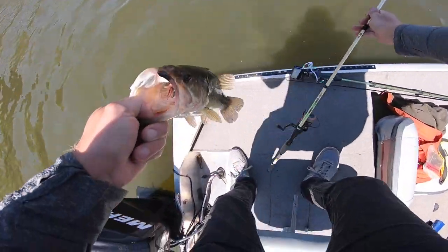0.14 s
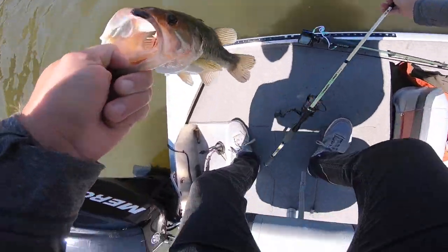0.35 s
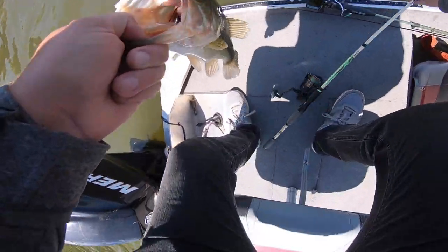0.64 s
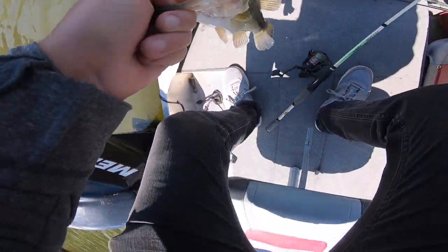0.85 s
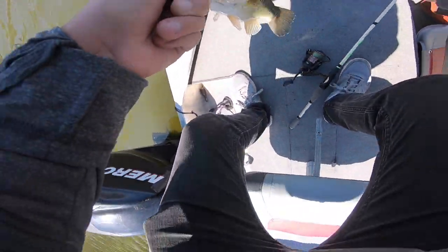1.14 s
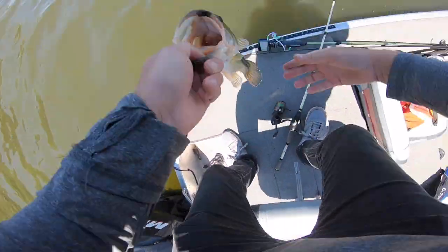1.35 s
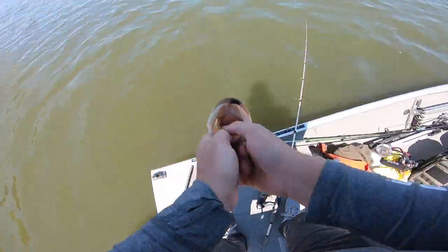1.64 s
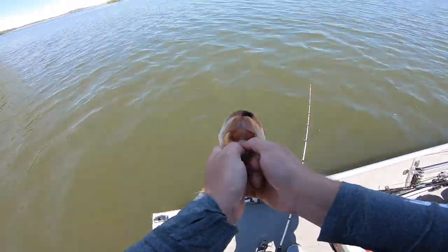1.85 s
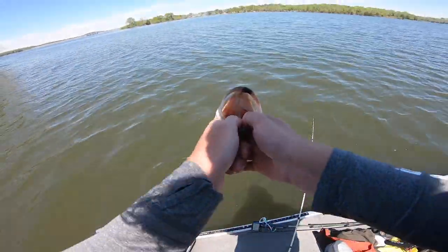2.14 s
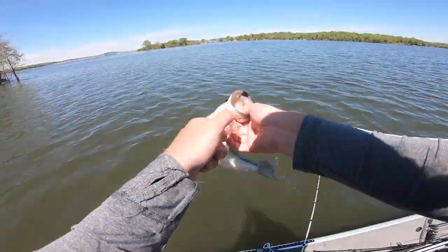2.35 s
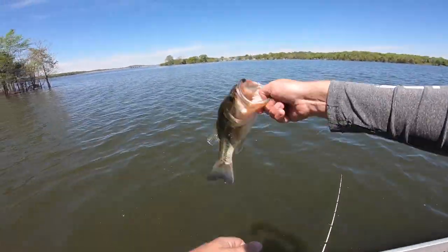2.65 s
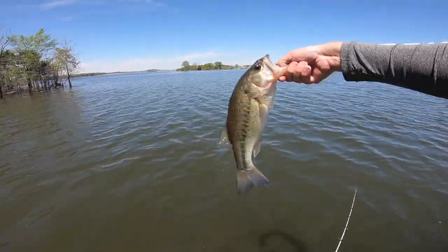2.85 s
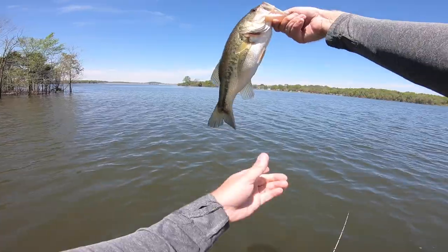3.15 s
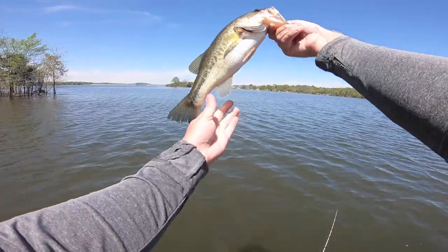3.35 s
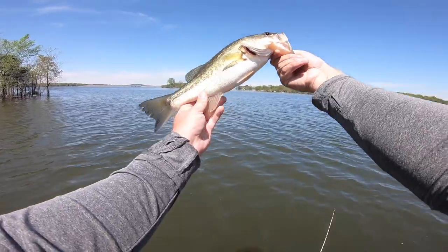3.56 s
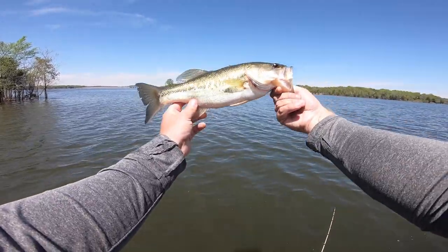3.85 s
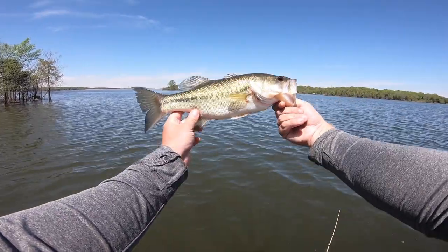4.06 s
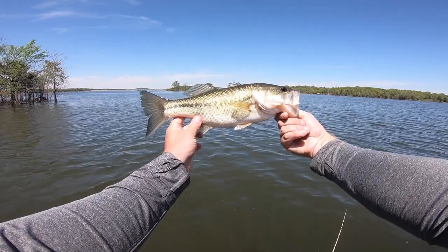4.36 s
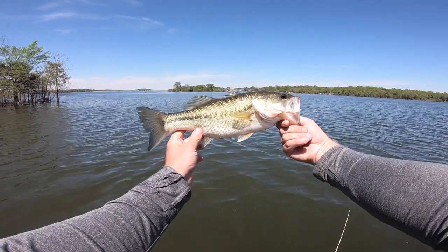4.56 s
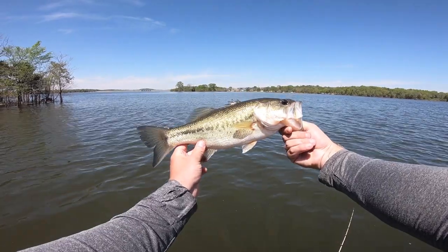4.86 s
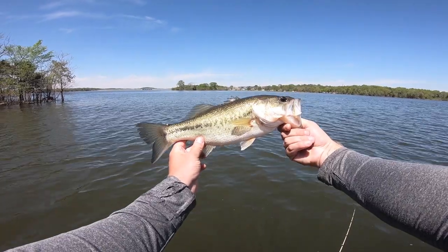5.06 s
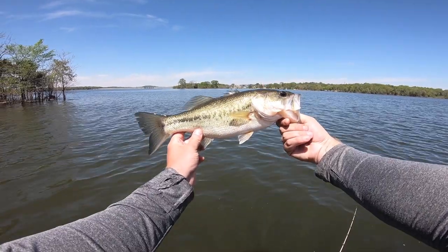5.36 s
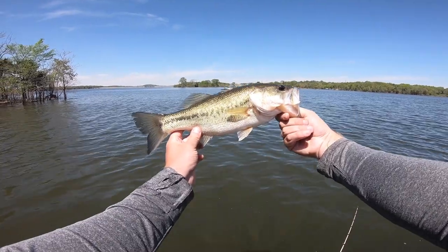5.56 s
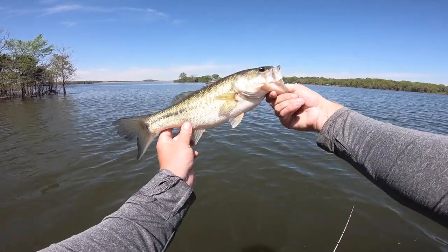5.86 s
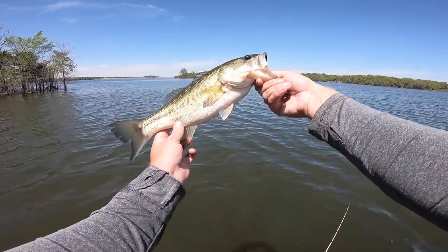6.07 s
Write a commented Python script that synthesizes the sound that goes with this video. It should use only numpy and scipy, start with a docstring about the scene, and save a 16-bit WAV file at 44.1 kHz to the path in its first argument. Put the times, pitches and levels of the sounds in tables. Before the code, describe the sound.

Gusts and low thumps hit the microphone on a small boat, with a rod clattering down, rustling sleeves and gently slapping water.

```python
"""Angler on a small boat

A rod clatters onto the deck, sleeves rustle and wet fingers squeak, close to a chest-worn camera.
Gusts buffet its two microphone ports, with low thumps and wind pops; a wide midrange hiss comes and goes.
Ripples wash, slap and bubble at the hull; tackle ticks, a buckle clicks and a bird whistles far off."""
import sys
import numpy as np
from scipy import signal
from scipy.fft import rfft, irfft, next_fast_len
from scipy.io import wavfile
from scipy.ndimage import uniform_filter1d, map_coordinates

SR = 44100
rng = np.random.default_rng(int(sys.argv[2]) if len(sys.argv) > 2 else 0)


def store_pcm(level_fs):
    """Save levels as 16-bit WAV."""
    pcm = np.round(np.clip(level_fs, -1, 1) * 32767).astype(np.int16)
    wavfile.write(sys.argv[1], SR, np.atleast_2d(pcm).T)


N = 274522
T = np.arange(SR // 3) / SR  # time axis of a one-shot [s]


def amp(db):
    """Decibels to gain."""
    return 10 ** (np.asarray(db) / 20)


def unit(x):
    """Normalise to rms 1."""
    return x / np.sqrt(np.mean(x ** 2) + 1e-20)


def struck(x):
    """Normalise a hit so that its loudest 3 ms have rms 1."""
    return x / np.sqrt(uniform_filter1d(x ** 2, size=132, axis=-1).max() + 1e-20)


def onset(rise):
    """A soft attack that builds over about rise seconds."""
    return 1 - np.exp(-(T / rise) ** 2)


def fade(t60):
    """A decay of 60 dB in t60 seconds."""
    return np.exp(-np.log(1000) * T / np.maximum(t60, 1e-3))


def held(start, end, rise, fall):
    """Full gain from start to end, 20 dB down at rise seconds before and fall seconds after."""
    t = np.arange(N) / SR
    return amp(-20 * (np.maximum(start - t, 0) / rise + np.maximum(t - end, 0) / fall))


def wobble(rate):
    """Smooth random modulation, rate knots a second."""
    return map_coordinates(rng.standard_normal(int(N * rate / SR) + 4), [np.arange(N) * rate / SR])


def filtered(x, response):
    """Apply a frequency response."""
    n = x.shape[-1]
    padded = next_fast_len(n + 8192)
    return irfft(rfft(x, padded) * response(np.fft.rfftfreq(padded, 1 / SR)), padded)[..., :n]


def coloured(x, points):
    """EQ through (frequency [Hz], level [dB]) points, then normalise to rms 1."""
    freqs, db = np.transpose(points)
    return unit(filtered(x, lambda hz: amp(np.interp(np.log(hz + 1), np.log(freqs + 1), db))))


def noise(points, width, size=N):
    """Coloured stereo noise: width 0 is mono, 1 fully decorrelated."""
    mid, side = coloured(rng.standard_normal((2, size)), points)
    return np.array([mid + width * side, mid - width * side]) / np.sqrt(1 + width ** 2)


def patchy(x, depth_db):
    """Make small patches in time and pitch swell and fade."""
    spectra = signal.stft(x, nperseg=512)[2]
    field = uniform_filter1d(rng.standard_normal(spectra.shape[1:]), size=6, axis=0)
    field = uniform_filter1d(field, size=9, axis=1)
    return unit(signal.istft(spectra * amp(depth_db * unit(field)), nperseg=512)[1][:, :N])


def panned(db):
    """Stereo gains of mean power 1, the left db above the right."""
    gains = amp(np.array([db, -db]).reshape(2, -1) / 2)
    return gains / np.sqrt(np.mean(gains ** 2, axis=0))


def ring(modes, scatter_db, damping=1):
    """Damped modes, struck at new strengths every time."""
    hz, db, t60 = np.transpose(modes)[:, :, None]
    sign = rng.choice([-1, 1], hz.shape)
    strength = sign * amp(db + scatter_db * rng.standard_normal(hz.shape))
    return np.sum(strength * fade(t60 / damping) * np.sin(2 * np.pi * hz * T), axis=0)


def whistle(start_hz, end_hz, length, rough):
    """A short gliding tone; roughness blurs it into narrow noise."""
    progress = np.clip(T / max(length, 1e-3), 0, 1)
    lowpass = signal.butter(2, start_hz / 30, fs=SR, output="sos")
    blur = signal.sosfilt(lowpass, rng.standard_normal((2, len(T))))
    phase = 2 * np.pi * np.cumsum(start_hz + (end_hz - start_hz) * progress) / SR
    tone = (1 + rough * unit(blur[0])) * np.sin(phase) + rough * unit(blur[1]) * np.cos(phase)
    return unit(tone) * np.abs(np.sin(np.pi * progress ** 0.58))


def add(track, s, sound):
    """Drop a one-shot into a stereo track at s seconds."""
    part = track[:, max(round(s * SR), 0):][:, :len(T)]
    part += sound[..., :part.shape[1]]


# The bed: dark wash, bright trickle, far drone, microphone hiss: (frequency [Hz], level [dB])
WASH_EQ = [(20, -24), (85, -21.5), (135, -5), (260, -8.5), (400, -3), (700, -8), (1000, -17.5),
           (2000, -38.5), (6000, -68)]
TRICKLE_EQ = [(400, -23), (900, 4.5), (1500, -1), (2100, -2), (2800, -10), (4000, -13.5), (9000, -47.5)]
DRONE_EQ = [(20, -20), (55, -8.5), (90, -28), (135, 3), (220, -3), (330, -13.5), (600, -42), (1100, -85)]
HISS_EQ = [(1000, 0.5), (5000, 6.5), (9000, -1), (12500, -8.5), (15500, -15)]


def lake():
    """Ripples wash and trickle round the boat over a low distant drone and a faint hiss."""
    swell_db = 2.5 * wobble(rate=3.4)
    wash = amp(-61.5 + swell_db) * patchy(noise(WASH_EQ, width=0.021), depth_db=4.5)
    trickle = amp(-83.5 + swell_db) * patchy(noise(TRICKLE_EQ, width=0.05), depth_db=0)
    drone = amp(-53) * noise(DRONE_EQ, width=0.011)
    hiss = amp(-83) * noise(HISS_EQ, width=0.24)
    return wash + trickle + drone + hiss


# The bird's four notes: (offset [s], relative level [dB], start pitch [Hz], end pitch [Hz], length [s])
BIRD_NOTES = [(0.0, -5.5, 2800, 3310, 0.064), (0.055, 0.5, 4310, 4850, 0.039), (0.11, -5, 3830, 3400, 0.04),
              (0.17, -8, 2726, 2510, 0.17)]
# Cues for the phrase: (time [s], relative level [dB])
BIRD_CUES = [(2.851, -66), (3.238, -59), (3.63, -61), (5.235, -74.5)]


def bird():
    """A bird repeats its phrase on the shore; the trees scatter it into a short tail."""
    out = np.zeros((2, N))
    for s, db in BIRD_CUES:
        for offset, note_db, start_hz, end_hz, length in BIRD_NOTES:
            add(out, s + offset, amp(db + note_db - 9) * whistle(start_hz, end_hz, length, rough=0.5))
    trees = rng.standard_normal((1, len(T))) * fade(t60=0.22)
    tail = signal.fftconvolve(out, trees / np.linalg.norm(trees), axes=1)[:, :N]
    return out + amp(-8.5) * tail


# Little gurgles at the hull: (time [s], relative level [dB], centre pitch [Hz], spread in time [s])
GURGLES = [(2.966, -56.5, 1300, 0.068), (4.583, -63.5, 1577, 0.025), (4.767, -52, 1163, 0.048),
           (4.851, -62, 1460, 0.031), (4.953, -56.5, 1484, 0.034), (5.181, -67, 1500, 0.033),
           (5.909, -67, 1820, 0.02)]


def bubbles():
    """Each gurgle is a cluster of bubbles of different sizes, each rising in pitch as it dies."""
    count, t60, attack_s = 22, 0.022, 0.001
    out = np.zeros((2, N))
    for s, db, hz, spread in GURGLES:
        birth = rng.random((count, 1)) * spread
        pitch = hz * np.exp(0.16 * rng.uniform(-1.26, 1, (count, 1)))
        strength_db = 3 * rng.standard_normal((count, 1))
        age = np.maximum(T - birth, 0)
        envelope = amp(strength_db - 60 * age / t60) * (1 - np.exp(-age / attack_s))
        chirps = np.sin(2 * np.pi * pitch * age * (1 + 0.8 * age))
        add(out, s, amp(db - 0.5) * struck(np.sum(envelope * chirps, axis=0)))
    return out


# Ripples hitting the hull: (time [s], level [dB], attack [s], t60 [s])
HULL_SLAPS = [(.15, -37.5, 0.048, 0.2), (4.775, -35.5, 0.016, 0.35), (5.538, -41, 0.0088, 0.32),
              (5.58, -32.5, 0.012, 0.16), (5.612, -37, 0.0083, 0.17)]
# The low body of a slap: (frequency [Hz], level [dB])
SLAP_EQ = [(71, -29), (120, -0.5), (173, 2.5), (255, -4), (334, 4), (403, -8), (500, -3), (720, -21.5),
           (1570, -48), (3000, -60), (3900, -78.5), (6600, -120)]


def hull_slaps():
    """A ripple swells against the hull and dies away with a little fine spray."""
    out = np.zeros((2, N))
    for s, db, rise, t60 in HULL_SLAPS:
        swell = onset(rise) * fade(t60)
        body = noise(SLAP_EQ, width=0.004, size=len(T))
        spray = amp(-34) * noise(TRICKLE_EQ, width=0.01, size=len(T))
        add(out, s, amp(db) * swell / swell.max() * (body + spray))
    return out


# Swells of the wide hiss: (start [s], end [s], level [dB])
WIDE_SWELLS = [(0.426, 0.57, -59), (0.59, 1.25, -55), (1.319, 1.72, -47), (1.75, 1.9, -51),
               (1.937, 2.2, -51), (2.284, 2.662, -59), (5.71, 6.126, -63.5)]
# Its midrange colour: (frequency [Hz], level [dB])
WIDE_EQ = [(320, -32.5), (550, 2), (699, -6), (957, -1.5), (1320, -10.5), (1710, -19.5), (3420, -34),
           (4080, -44), (5000, -39), (6500, -70.5), (11000, -120)]


def wide_hiss():
    """A wide midrange hiss swells and fades, opposite in phase left and right."""
    envelopes = [amp(db) * held(start, end, rise=0.1, fall=0.24) for start, end, db in WIDE_SWELLS]
    hiss = unit(coloured(rng.standard_normal(N), WIDE_EQ) * amp(1.6 * wobble(rate=22)))
    return np.array([[1], [-1]]) * np.max(envelopes, axis=0) * hiss


# Gusts on the ports: (start [s], end [s], flutter level [dB], rumble over flutter [dB],
# left over right [dB], stereo width [0-1])
PORT_GUSTS = [(0.009, 0.307, -41, -6.5, 1, 0), (0.434, 0.535, -33, -2.5, -4, 0.86),
              (0.564, 0.671, -30.5, 0, -3.5, 0.86), (0.74, 1.033, -35, -8.5, -12, 0.85),
              (1.082, 1.23, -39, -13, -7, 0.98), (1.344, 1.601, -30.5, -7.5, -13, 0.7),
              (1.739, 1.822, -38.5, 0.5, -15, 0.92), (1.828, 2.056, -32.5, 6.5, -2.5, 1),
              (2.035, 2.256, -29.5, 4.5, -3, 1), (2.297, 2.385, -43.5, 10, -10, 0.93),
              (2.46, 2.738, -49, -12, -13.5, 0.93), (3.023, 3.081, -49.5, 5, 1.5, 0),
              (4.407, 4.955, -57.5, -3.5, 2, 0), (5.039, 5.144, -39.5, 6.5, -4.5, 1),
              (5.15, 5.334, -41, 11.5, -2.5, 1), (5.444, 5.5, -40, 9, -7.5, 1),
              (5.56, 5.662, -35, 6.5, -4, 1), (5.68, 5.8, -33.5, 11, -1, 1),
              (5.898, 6.049, -42, 9.5, -7, 0.9), (6.205, 6.3, -29.5, -12, -15, 0.93)]
# The two layers of a gust: (frequency [Hz], level [dB])
RUMBLE_EQ = [(10, -23), (25, -7.5), (60, -1), (100, -6.5), (160, -13.5), (400, -57), (1000, -100)]
FLUTTER_EQ = [(40, -33), (90, -4), (140, 3), (220, -4.5), (320, -13.5), (480, -23.5), (900, -42),
              (3000, -91)]


def buffeting():
    """Gusts push on each port in lumps: a deep rumble and a faster flutter."""
    flutter_power, rumble_power, wide_power = np.zeros((2, N)), np.zeros((2, N)), np.zeros(N)
    for start, end, db, rumble_db, pan_db, gust_width in PORT_GUSTS:
        power = (amp(db) * panned(pan_db) * held(start, end, rise=0.095, fall=0.072)) ** 2
        flutter_power += power
        rumble_power += power * amp(rumble_db) ** 2
        wide_power += gust_width * power.mean(axis=0)
    calm_power = amp(-71) ** 2  # the air is never quite still
    width = wide_power / (flutter_power.mean(axis=0) + calm_power)
    lumps = amp(3.5 * wobble(rate=28))
    rumble = np.sqrt(rumble_power + calm_power) * unit(noise(RUMBLE_EQ, width) * lumps)
    flutter = unit(noise(FLUTTER_EQ, width) * lumps * amp(1.3 * wobble(rate=70)))
    return rumble + np.sqrt(flutter_power) * flutter


def hollow_band(hz):
    """A narrow, hollow band of hiss in each sleeve swish, coloured by the microphone."""
    step = 1.17  # frequency ratio from the centre of the band to its shoulders
    band = [(hz / step ** 4, -50), (hz / step, -13), (hz, 0),
            (hz * step, -13), (hz * step ** 4, -50), (hz * step ** 12, -90)]
    return noise(band, width=0.087)


# Arm moves: (start [s], end [s], swish level [dB], closeness to the ports [dB], band centre [Hz],
# band over swish [dB])
ARM_MOVES = [(0.0, 0.203, -70, -6, 4600, 1), (0.323, 0.675, -69, -2, 6160, -7.5),
             (0.707, 1.276, -77.5, 0, 7300, -16), (1.271, 1.84, -66.5, -0.5, 4400, -5.5),
             (2.035, 2.156, -70, -1, 4400, -7), (2.318, 2.661, -75.5, -3.5, 6110, -7.5),
             (2.779, 3.0, -73, -18, 4640, 0.5), (3.1, 3.22, -71.5, -23, 5000, -5.5),
             (3.297, 3.509, -77.5, -25, 4900, -4.5), (3.676, 3.888, -74.5, -31, 4810, 1),
             (4.316, 4.993, -82.5, -12, 4500, -3.5), (5.184, 5.4, -86.5, -9, 4670, 3),
             (5.429, 5.52, -92.5, 1.5, 4750, 10.5), (5.56, 5.75, -82.5, 3.5, 4500, 3.5),
             (6.22, 6.297, -64.5, -7, 4900, 0)]
# Cloth layers: airy swish, rustling folds, crisp scratch, dull rub: (frequency [Hz], level [dB])
SWISH_EQ = [(1200, -31), (2600, -8), (3250, -8), (3800, 2.5), (4600, 3.5), (5400, 0), (6300, -0.5),
            (7300, -13.5), (10000, -20.5), (15000, -47.5)]
RUSTLE_EQ = [(400, -12.5), (900, 0.5), (1200, 2), (1450, 5.5), (1750, 0), (2200, -3), (2900, -10.5),
             (4000, -26), (9000, -41)]
SCRATCH_EQ = [(2000, -18.5), (3200, -13), (5000, -5), (7800, 1.5), (10800, -12.5), (12700, -9),
              (15500, -20)]
RUB_EQ = [(60, -25.5), (150, -5), (400, 0), (700, -9.5), (1000, -12.5), (2000, -37.5), (6000, -69.5)]


def sleeves():
    """Sleeves swish and rustle; near the ports threads crackle and cloth rubs the housing."""
    motion, contact, bands = np.zeros(N), np.zeros(N), np.zeros((2, N))
    for start, end, db, close_db, band_hz, band_db in ARM_MOVES:
        swing = amp(db) * held(start, end, rise=0.039, fall=0.28)
        motion = np.maximum(motion, swing)
        contact = np.maximum(contact, swing * amp(close_db))
        bands += amp(band_db) * swing * hollow_band(band_hz)
    swish = patchy(noise(SWISH_EQ, width=0.08), depth_db=2.6)
    rustle = amp(6.5) * patchy(noise(RUSTLE_EQ, width=0.04), depth_db=4)
    catches = rng.random(N) < 260 / SR  # about 260 threads catch each second
    crackle = catches * rng.standard_normal(N) * amp(3.9 * rng.standard_normal(N))
    scratch = noise(SCRATCH_EQ, width=1) + 0.5 * coloured(crackle, SCRATCH_EQ)
    scratch = unit(scratch * amp(1.1 * wobble(rate=64)))
    rub = amp(14.5) * noise(RUB_EQ, width=0.11)
    return motion * (swish + rustle) + bands * amp(1.7 * wobble(rate=45)) + contact * (scratch + rub)


# A cuff brushing close to the ports: (time [s], level [dB], length [s])
CUFF_STROKES = [(0.044, -79, 0.4), (0.292, -83, 0.23), (0.496, -69, 0.22), (0.946, -69, 0.23),
                (1.632, -57, 0.15), (2.016, -63.5, 0.21), (2.287, -63.5, 0.034), (2.393, -67.5, 0.033),
                (2.614, -72, 0.02), (3.086, -81, 0.13), (5.471, -67.5, 0.38), (6.173, -66, 0.23)]
# Its bright scratch: (frequency [Hz], level [dB])
CUFF_EQ = [(2000, -1.5), (5000, 0), (8300, 2), (10500, -6), (12500, -6.5), (14200, -8.5), (15600, -25)]


def cuff_strokes():
    """Each drag of the cuff is a short, grainy scratch."""
    out = np.zeros((2, N))
    for s, db, length in CUFF_STROKES:
        progress = np.clip(T / length, 0, 1)
        swell = np.abs(np.sin(np.pi * progress ** 0.69)) ** 1.3
        grain = unit(noise(CUFF_EQ, width=0.9, size=len(T)) * amp(3.2 * wobble(rate=250)[:len(T)]))
        add(out, s, amp(db) * swell * grain)
    return out


# Wet squeaks: (time [s], relative level [dB], pitch [Hz], length [s])
FINGER_SQUEAKS = [(0.12, -49.5, 4550, 0.034), (0.124, -62.5, 6080, 0.18), (0.179, -47.5, 4410, 0.012),
                  (2.284, -51, 5950, 0.016), (2.336, -60, 5660, 0.021), (2.396, -51, 5920, 0.014),
                  (3.094, -49, 1392, 0.062), (3.143, -55, 5050, 0.019)]


def finger_squeaks():
    """Wet fingers squeak on rod and fish in short, rough tones."""
    out = np.zeros((2, N))
    for s, db, hz, length in FINGER_SQUEAKS:
        add(out, s, amp(db - 8.5) * whistle(hz, hz, length, rough=2.2))
    return out


# Ticks and scuffs of tackle and cuffs: (time [s], level [dB], pitch [Hz], t60 [s])
TACKLE_TICKS = [(0.208, -64.5, 10000, 0.05), (0.312, -58.5, 4570, 0.018), (0.328, -66, 6500, 0.015),
                (0.346, -43, 1220, 0.057), (0.349, -57.5, 11600, 0.02), (0.3612, -45.5, 8930, 0.0094),
                (0.362, -40.5, 1670, 0.014), (0.5494, -45, 4750, 0.015), (0.577, -52.5, 6800, 0.017),
                (0.5839, -56.5, 11080, 0.015), (1.072, -58, 3830, 0.089), (1.132, -61, 4430, .02),
                (1.272, -46, 4000, .04), (1.325, -42.5, 10980, 0.031), (1.623, -50, 5830, 0.037),
                (1.638, -49, 6800, 0.093), (1.652, -44.5, 1440, 0.15), (1.667, -51, 2580, 0.02),
                (1.682, -46, 6160, 0.015), (1.901, -55.5, 2600, 0.036), (2.0293, -56, 6400, 0.01),
                (2.0795, -56, 3750, 0.026), (2.631, -59.5, 4830, 0.053), (2.717, -53, 1260, 0.15),
                (3.148, -55, 596, 0.03), (4.298, -56.5, 1570, 0.16), (4.307, -69, 4120, 0.043),
                (4.358, -73, 5550, 0.01), (5.309, -75, 5700, 0.023), (6.081, -65, 850, 0.043)]


def tackle_ticks():
    """Tiny dry contacts, each a burst of noise round its own pitch."""
    out = np.zeros((2, N))
    for s, db, hz, t60 in TACKLE_TICKS:
        band = [(hz / 8, -28), (hz / 1.9, -7), (hz, 0), (hz * 1.9, -7), (hz * 3, -30), (hz * 8, -60)]
        burst = noise(band, width=0.26, size=len(T)) * fade(t60) * onset(rise=3 / hz)
        add(out, s, amp(db) * struck(burst))
    return out


# Light taps on the hull: (time [s], level [dB], damping [ratio])
HULL_TAPS = [(4.313, -55, 1.1), (4.478, -53.5, 0.9)]
# The hull's metallic ring: (frequency [Hz], level [dB], t60 at damping 1 [s])
HULL_MODES = [(1265, 8.5, 0.2), (1840, 7, 0.044), (1998, 6, 0.07), (2850, -4, 0.055), (3460, 5, 0.034),
              (4660, 1, 0.046), (5850, -8, .03)]


def hull_taps():
    """A light tap gives a short crack and sets the metal hull ringing."""
    out = np.zeros((2, N))
    for s, db, damping in HULL_TAPS:
        crack = struck(noise(SWISH_EQ, width=0.032, size=len(T)) * fade(t60=0.021))
        metal = struck(ring(HULL_MODES, scatter_db=4, damping=damping))
        add(out, s, amp(db) * struck(onset(rise=0.0008) * (metal + 0.69 * crack)))
    return out


# Hard, hollow clicks on the harness: (time [s], level [dB])
BUCKLE_CLICKS = [(3.157, -54), (3.1658, -43.5)]
# The buckle's resonances: (frequency [Hz], level [dB], t60 [s])
BUCKLE_MODES = [(1740, -3, 0.03), (2060, 3, 0.014), (3000, 2, 0.0072), (3290, -5, 0.012), (4880, -3, 0.013),
                (5300, -6, 0.011)]


def buckle_clicks():
    """A plastic buckle is nudged and rings for a moment."""
    out = np.zeros((2, N))
    for s, db in BUCKLE_CLICKS:
        add(out, s, amp(db) * struck(ring(BUCKLE_MODES, scatter_db=1) * onset(rise=0.00063)))
    return out


# Low thumps and wind pops on the microphones: (time [s], thud level [dB], settled pitch [Hz], t60 [s],
# left over right [dB], hollow level [dB], knock level [dB], knock pitch [Hz])
THUMPS_AND_POPS = [(.362, -45.5, 581, 0.095, -1, -49, -53, 855),
                   (0.5781, -16.5, 152.5, 0.037, -1.5, -41, -43, 720),
                   (0.594, -23, 166, 0.068, -4, -42, -42, 600),
                   (0.989, -23, 161.4, 0.086, -20, -38, -37, 536),
                   (1.286, -28.5, 277, 0.085, -2, -39, -54, 710),
                   (1.9352, -11, 139, 0.025, -28, -28, -23, 682),
                   (2.063, -14.5, 75.5, 0.045, 21, -36, -57, 600),
                   (2.1038, -22, 110, 0.023, -23, -38, -31, 594),
                   (2.109, -10.5, 104.5, 0.069, -37, -19, -20.5, 664),
                   (2.2099, -22.5, 126, 0.036, -14, -36, -56, 490),
                   (2.251, -35, 159, 0.038, -12, -38, -48, 503),
                   (2.611, -35, 108, 0.056, -19, -45.5, -41, 600),
                   (2.7207, -16.5, 140, 0.038, -21.5, -28.5, -27.5, 620),
                   (2.7338, -20.5, 149.6, 0.053, -22, -32.5, -23, 490),
                   (3.165, -40.5, 410, 0.04, -3, -43, -51, 462),
                   (5.157, -24, 110, 0.019, 27, -64, -50, 453.4),
                   (5.237, -27.5, 113, 0.038, -12, -51, -46, 507),
                   (5.785, -18.5, 97.7, 0.037, 9.5, -46.5, -50, 503),
                   (5.964, -26, 130, 0.067, -28, -43, -52, 468),
                   (6.151, -15.5, 138, 0.031, -21, -22.5, -32, 996)]


def thumps_and_pops():
    """Each thump or wind pop is a few low cycles with a hollow ring and a short, higher knock."""
    hollow_hz, pitch_drop_s, max_lag_rad = 282, 0.003, 2.73
    out = np.zeros((2, N))
    for s, db, hz, t60, pan_db, hollow_db, knock_db, knock_hz in THUMPS_AND_POPS:
        pitch = hz * (1 + 0.98 * np.exp(-T / pitch_drop_s))  # starts about an octave high and sinks
        thud = np.sin(2 * np.pi * np.cumsum(pitch) / SR) * onset(rise=0.0034) * fade(t60)
        hollow = np.sin(2 * np.pi * hollow_hz * T) * onset(rise=0.003) * fade(t60=0.036)
        # a knock from one side reaches the two ports out of step
        lag = np.array([[0], [max_lag_rad * min(abs(pan_db) / 10, 1)]])
        knock = np.sin(2 * np.pi * knock_hz * T + lag) * onset(rise=0.0019) * fade(t60=0.0084)
        body = amp(db) * struck(thud) + amp(hollow_db) * struck(hollow)
        add(out, s, body * panned(pan_db) + amp(knock_db) * struck(knock) * panned(pan_db / 8))
    return out


def clack(modes, rattle_eq, decay, rattle_db, width):
    """One contact: modes and a rough rattle die quickly, leaving a faint ring-out."""
    hit_t60, tail_t60, tail_db = 1.2 * decay, 4.1 * decay, -23.5
    body = struck(ring([(hz, db, tail_t60) for hz, db in modes], scatter_db=4.5))
    rattle = amp(rattle_db) * noise(rattle_eq, width, size=len(T)) * fade(tail_t60)
    return struck((body + rattle) * (fade(hit_t60) + amp(tail_db)) * onset(rise=0.00046))


# Rod hits and rebounds: (time [s], shaft level [dB], reel level [dB], decay scale [s])
ROD_BOUNCES = [(0.347, -46, -47.5, 0.023), (0.3604, -47.5, -38, 0.0083), (0.581, -45.5, -46, 0.05),
               (1.2744, -21.5, -25, 0.05), (1.2863, -31, -15.5, 0.016), (1.298, -36.5, -31, 0.068),
               (1.3175, -24, -27, 0.034), (1.3282, -37.5, -15.5, 0.015), (1.3395, -52.5, -33.5, 0.031),
               (1.352, -55, -50, 0.03), (1.516, -34.5, -38.5, 0.059), (1.525, -34, -38.5, 0.07),
               (1.554, -40, -47, 0.099), (1.566, -43, -45.5, 0.025), (1.658, -44.5, -44.5, 0.099)]
# Resonances of shaft and reel: (frequency [Hz], level [dB])
SHAFT_MODES = [(1446, -9), (1760, -3), (2550, -7), (2850, -11), (3310, -1.5), (3400, -3), (3790, -8),
               (4295, -9.5), (4740, -11.5), (5400, -9)]
REEL_MODES = [(4800, -6.5), (4970, -10), (5450, -6.5), (6230, -2), (6800, -2.5), (7150, -4), (7330, -2),
              (7720, 9.5), (8080, -6.5), (9900, -14)]
# The colour of their rattle: (frequency [Hz], level [dB])
SHAFT_EQ = [(300, -12.5), (1100, -7.5), (1600, 1.5), (2200, -3.5), (3400, -2), (5000, -3), (8000, -16.5),
            (12500, -24), (16000, -38)]
REEL_EQ = [(1000, -27), (3800, -12.5), (4800, 0.5), (7200, -2), (8200, -2), (9000, -14), (12500, -30.5),
           (16000, -39.5)]
# Phase of the right port against the left: (frequency [Hz], phase [rad])
PORT_PHASE = [(5000, 0.5), (7300, 1.4), (8100, 4)]


def rod_clatter():
    """The rod hits the deck and bounces: its shaft answers low, the hard reel high."""
    out = np.zeros((2, N))
    for s, shaft_db, reel_db, decay in ROD_BOUNCES:
        shaft = clack(SHAFT_MODES, SHAFT_EQ, decay, rattle_db=0.5, width=0.66) * panned(-1.3)
        reel = clack(REEL_MODES, REEL_EQ, decay, rattle_db=-4.5, width=0.69) * panned(4.6)
        add(out, s, amp(shaft_db) * shaft + amp(reel_db) * reel)
    freqs, phase = np.transpose(PORT_PHASE)
    return filtered(out, lambda hz: np.exp(1j * np.outer([0, 1], np.interp(hz, freqs, phase))))


def scene():
    """Open water gives no echo: everything on the boat is close and dry."""
    air_and_water = buffeting() + lake() + hull_slaps()
    textures = sleeves() + wide_hiss() + cuff_strokes()
    props = rod_clatter() + tackle_ticks() + hull_taps() + buckle_clicks()
    return air_and_water + textures + props + thumps_and_pops() + finger_squeaks() + bubbles() + bird()


def record(dry):
    """The microphones soften the very top, and the camera keeps nothing above its band limit."""
    knee_hz, limit_hz = 14800, 15730
    return filtered(dry, lambda hz: (hz < limit_hz) / np.sqrt(1 + (hz / knee_hz) ** 32))


dry = scene()
out = record(dry)
store_pcm(out)
```